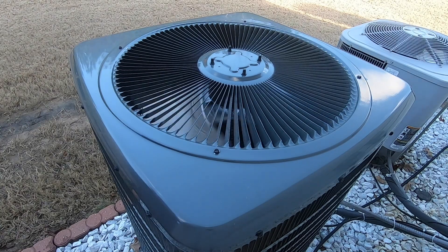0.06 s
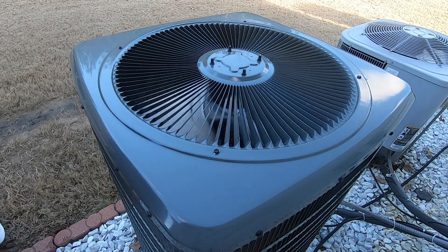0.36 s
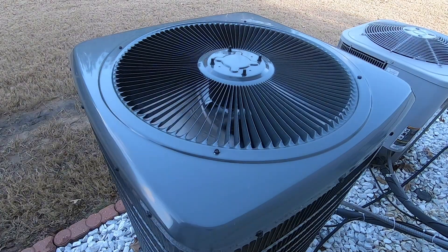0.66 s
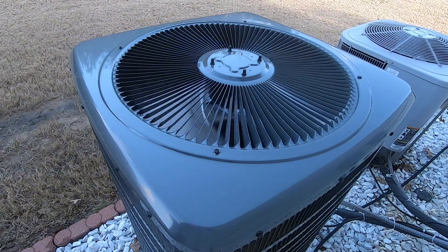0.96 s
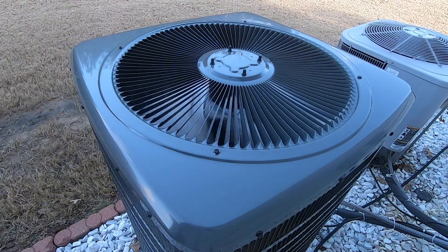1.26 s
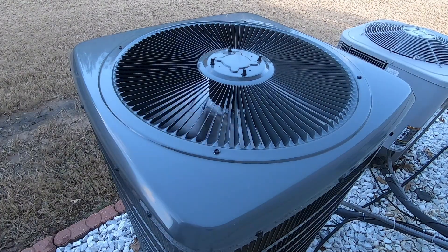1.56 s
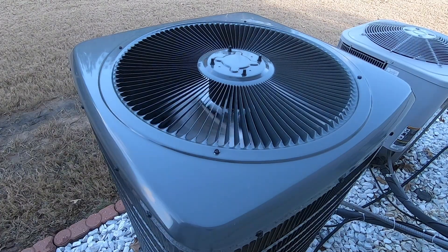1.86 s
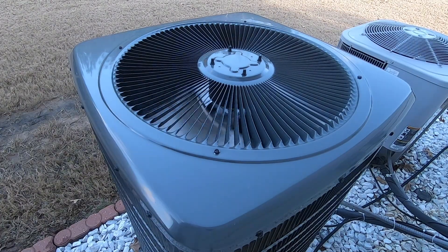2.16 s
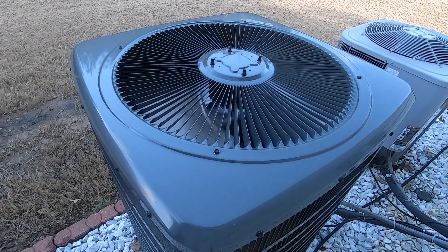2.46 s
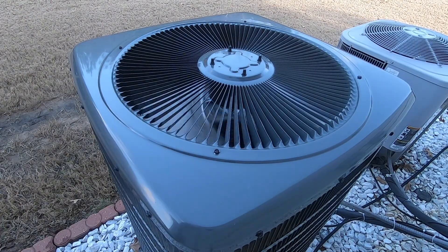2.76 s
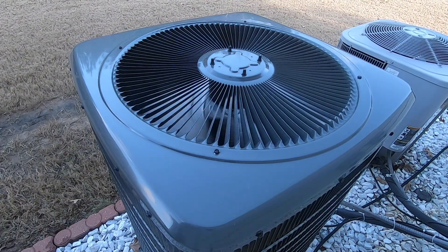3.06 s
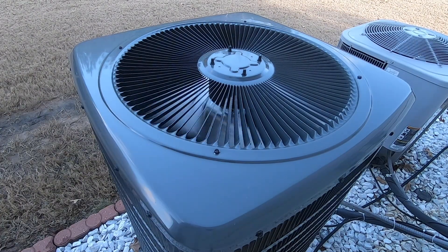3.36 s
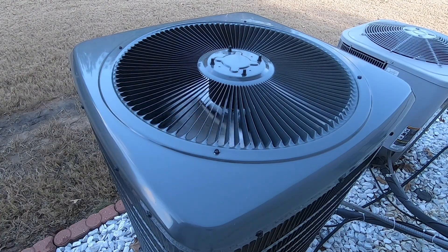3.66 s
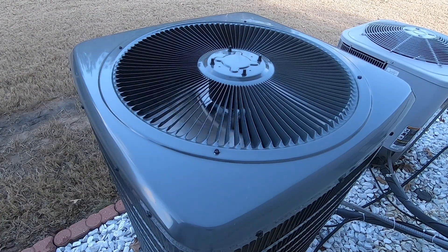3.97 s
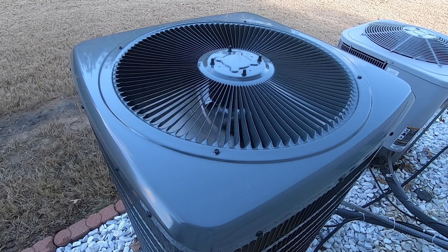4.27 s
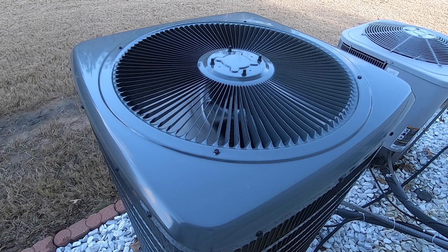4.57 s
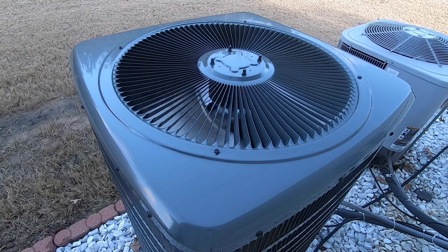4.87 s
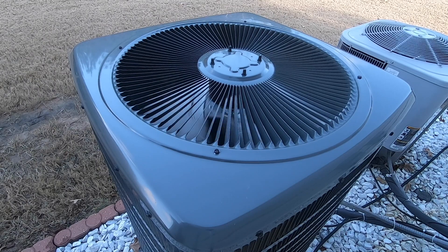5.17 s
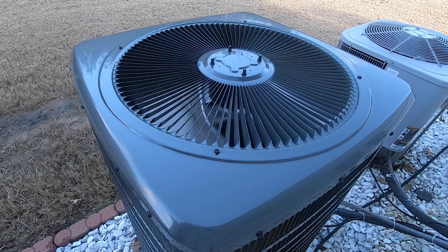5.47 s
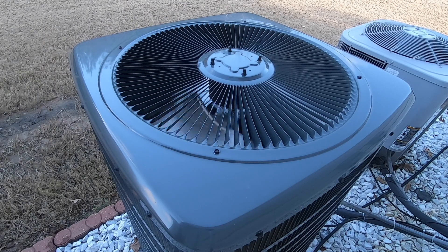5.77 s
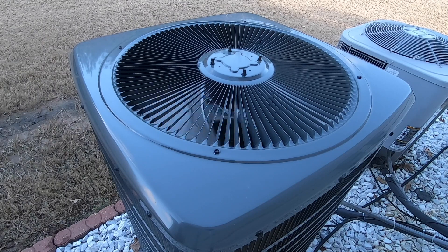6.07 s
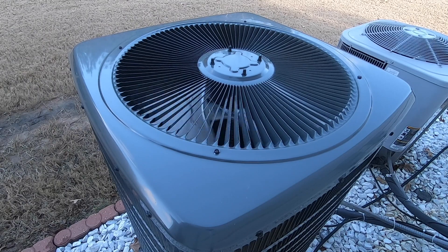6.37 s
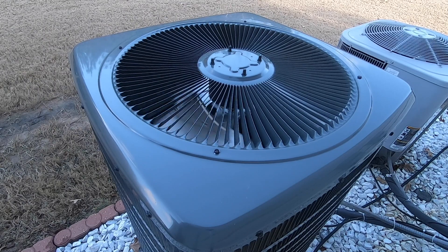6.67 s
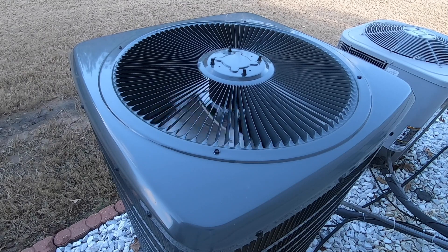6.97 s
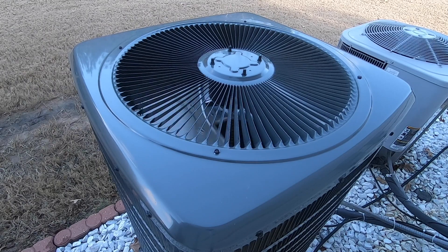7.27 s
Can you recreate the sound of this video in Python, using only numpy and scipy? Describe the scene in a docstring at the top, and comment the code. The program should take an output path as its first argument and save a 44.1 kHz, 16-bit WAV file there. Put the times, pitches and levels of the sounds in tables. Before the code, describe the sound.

An outdoor heat pump runs close by in the open air, its fan whooshing over a humming compressor, with one small snap from the cabinet. The sound turns duller as a hollow roar swells and the draught buffets the microphone. The unit then switches off with a clunk, a rush of gas and a low groan, followed by metallic knocks, a squeak and slowing ticks. The fan coasts down, leaving a second unit humming quietly.

```python
"""An outdoor heat pump runs: three-blade fan, compressor, mains hum; the cabinet snaps once.
Its draught buffets a near microphone; from 2.8 s the sound dulls and narrows, and a hollow roar swells.
At 4.8 s it switches off with a clunk; gas rushes back, the compressor groans, knocks, squeaks and
ticks to rest. The fan coasts down, the image reopens, and a second unit is left humming quietly."""
import sys
import numpy as np
from scipy import signal
from scipy.fft import rfft, irfft, next_fast_len
from scipy.io import wavfile
from scipy.ndimage import map_coordinates

SR = 44100
rng = np.random.default_rng(int(sys.argv[2]) if len(sys.argv) > 2 else 0)


def log_audio(samples):
    """Write samples as a 16-bit WAV file to the path given in sys.argv[1]."""
    # one column per channel
    frames = np.atleast_2d(samples).T
    # limit to full scale, then quantise
    limited = np.clip(frames, -1, 1)
    pcm = np.round(limited * 32767).astype(np.int16)
    wavfile.write(sys.argv[1], SR, pcm)


N = 331191
T = np.arange(N) / SR
STOP_S = 4.81  # power cut


def amp(db):
    """Decibels to gain."""
    return np.exp(np.asarray(db) * (np.log(10) / 20))


def unit(x):
    """Scales to rms 1."""
    return x / np.sqrt(np.mean(x ** 2) + 1e-20)


def curve(rows, column=1):
    """One column of a time table at every sample."""
    rows = np.array(rows, float)
    return np.interp(T, rows[:, 0], rows[:, column])


def ramp(start_s, length_s):
    """Linear rise from 0 to 1."""
    return np.clip((T - start_s) / length_s, 0, 1)


def since(s):
    """Seconds after time s, 0 before."""
    return np.maximum(T - s, 0)


def swell(s, half_s):
    """Rounded peak at time s with exponential flanks."""
    return 1 / np.cosh(np.minimum(abs(T - s) / half_s, 100) * np.pi / 2)


def drift(rate_hz):
    """Smooth random curve of rms 1."""
    knots = rng.standard_normal(4096)
    return unit(map_coordinates(knots, [T[::64] * rate_hz], order=3, mode="wrap")).repeat(64)[:N]


def add(mix, s, sound):
    """Mixes a sound in at time s."""
    part = mix[..., round(s * SR):][..., :sound.shape[-1]]
    part += sound[..., :part.shape[-1]]


def lowpass(x, hz, order=2):
    """Butterworth low-pass."""
    return signal.sosfilt(signal.butter(order, min(hz, .45 * SR), fs=SR, output="sos"), x)


def resonate(x, hz, width_hz, lift_db):
    """Lifts one band with a ringing resonance."""
    band = signal.lfilter(*signal.iirpeak(hz, 2 * hz / width_hz, fs=SR), x)
    return x + (amp(lift_db) - 1) * band


def colour(x, spectrum, peaks=()):
    """Filters by a smooth spectrum with resonant bumps."""
    size = next_fast_len(x.shape[-1])
    hz = np.fft.rfftfreq(size, 1 / SR)
    knot_hz, knot_db = np.transpose(spectrum)
    db = np.interp(np.log(hz + 1), np.log(knot_hz), knot_db)
    db += sum(lift / (1 + (2 * (hz - centre) / width) ** 2) for centre, width, lift in peaks)
    return irfft(rfft(x, size) * amp(db), size)[..., :x.shape[-1]]


def hiss(spectrum, peaks=()):
    """Stereo noise of a given density, narrowest in the low mids, rolled off above the last point."""
    spread = [(25, -3), (60, -3.5), (130, -15), (290, -19.5), (640, -7.5), (1400, -2), (3100, -8.5),
              (4600, -4.5), (6800, 2), (9000, 3), (10500, -2), (15000, 0)]  # stereo width: f/Hz, side re mid/dB
    mid, side = rng.standard_normal((2, N)) * np.sqrt(SR / 2)
    side = colour(side, spread)
    top_hz, top_db = spectrum[-1]
    rolled_off = list(spectrum) + [(2 * top_hz, top_db - 50)]
    return colour(np.array([mid + side, mid - side]), rolled_off, peaks)


def tones(rows, hz, waver_db, waver_hz=3):
    """Multiples of hz, each wavering in level."""
    turns = np.cumsum(hz * np.ones(N)) / SR
    out = 0
    for multiple, db in rows:
        gain = np.sqrt(2) * amp(db + waver_db * drift(waver_hz))
        out += gain * np.sin(2 * np.pi * (multiple * turns + rng.random()))
    return out


def narrowband(hz, width_hz):
    """Noisy partial of rms 1; its centre may move."""
    a, b = lowpass(rng.standard_normal((2, N)), width_hz / 2)
    turns = np.cumsum(hz * np.ones(N)) / SR
    return unit(((a + 1j * b) * np.exp(2j * np.pi * turns)).real)


def fan_speed(drag_per_s=.9):
    """Share of full speed: drag slows the unpowered fan."""
    return 1 / (1 + drag_per_s * since(STOP_S))


def neighbour():
    """The second unit hisses and hums steadily."""
    air = [(15, -76), (35, -82), (90, -66), (170, -75), (330, -85), (650, -82), (1100, -90), (1900, -99.5),
           (3800, -101), (5500, -113), (8000, -114), (9900, -118), (10700, -127), (12700, -128),
           (13500, -145)]  # its hiss: f/Hz, density/(dB per Hz)
    resonances = [(2169, 45, 10), (2369, 50, 9), (2573, 40, 7), (2891, 32, 12), (3284, 60, 9),
                  (3677, 80, 8), (3840, 90, 9.5), (4113, 65, 11), (4450, 70, 7), (4700, 230, 9),
                  (5270, 70, 7), (5460, 170, 7.5), (5960, 80, 6), (6190, 70, 8.5), (6842, 90, 8.5),
                  (8010, 190, 10), (8301, 90, 9), (9900, 160, 7)]  # f/Hz, width/Hz, lift/dB
    hum = [(91.5, -50), (120, -52.5), (581, -69.5)]  # f/Hz, level/dB
    return hiss(air, resonances) * amp(.5 * drift(8.8)) + tones(hum, 1, waver_db=-0.5)


def wind(roar_start_s=3.035, roar_rise_s=0.31, roar_hold_s=0.46, roar_fade_db_per_s=6.5):
    """Draught and deep buffeting follow exposure and fan speed; a roar over the grille swells and fades."""
    exposure = [(0, -14), (3.0, -21.5), (3.4, -16), (3.85, -27), (4.04, -3), (4.35, -2), (4.8, -1.5)]  # draught reaching the microphone: t/s, level/dB
    draught_spectrum = [(15, -74), (35, -58), (110, -51), (200, -57), (400, -59), (700, -64), (1200, -68.5),
                        (2000, -76), (4000, -90), (8000, -115)]  # f/Hz, density/(dB per Hz)
    hollow_resonance = [(247, 30, 1)]  # f/Hz, width/Hz, lift/dB
    buffet_spectrum = [(12, -68), (30, -52.5), (55, -47.5), (100, -51.5), (150, -56.5), (250, -72.5),
                       (600, -100)]  # f/Hz, density/(dB per Hz)
    roar_spectrum = [(150, -101), (380, -73), (540, -64), (720, -65), (1000, -72.5), (1500, -77.5),
                     (3000, -100), (5100, -89), (6400, -108)]  # f/Hz, density/(dB per Hz)
    exposure_db, speed = curve(exposure), fan_speed()
    draught = hiss(draught_spectrum, hollow_resonance) * amp(exposure_db + 1.1 * drift(25))
    buffet = hiss(buffet_spectrum) * amp(0.71 * exposure_db + drift(13))
    fade_db = roar_fade_db_per_s * since(roar_start_s + roar_rise_s + roar_hold_s)
    roar = hiss(roar_spectrum) * ramp(roar_start_s, roar_rise_s) * amp(drift(11) - fade_db)
    return draught * speed ** 2.46 + buffet * speed ** 1.6 + roar


def gusts():
    """Single eddies thump the two microphone ports unequally."""
    eddies = [(2.116, .014, -22, 16, 190), (2.575, .03, -20.5, 5, 110), (2.69, .04, -26, -4, 150),
              (2.865, .014, -18, 2, 220), (3.045, .035, -21, -7, 100), (3.385, .013, -21.5, 0, 90),
              (3.485, .03, -28.5, 0, 150), (3.622, .013, -14, 0, 130), (6.02, .04, -34, 0, 110),
              (6.18, .03, -35, 0, 130), (6.52, .04, -36, 0, 110)]  # t/s, Gaussian sigma/s, level/dB, left re right/dB, upper edge/Hz
    out, t = np.zeros((2, N)), np.arange(-SR // 5, SR // 5) / SR
    for s, sigma_s, db, pan_db, edge_hz in eddies:
        eddy = lowpass(rng.standard_normal((2, len(t))), edge_hz, order=3)
        eddy -= lowpass(eddy, 3.8, order=1)
        shape = np.exp(-(t / sigma_s) ** 2 / 2)
        eddy = np.array([unit(port * shape) for port in eddy]) * np.sqrt(np.mean(shape ** 2))
        add(out, s + t[0], eddy * amp([[db + pan_db / 2], [db - pan_db / 2]]))
    return out


def cabinet_snap(at_s=.5045, gain_db=-20.5, t60_s=0.012, tail_db=-16, tail_t60_s=0.07):
    """A small dull snap with a faint tail."""
    spectrum = [(300, -17), (1200, 1), (2800, 5), (4000, 0), (5500, -9), (8500, -14), (10500, -33),
                (15000, -48)]  # f/Hz, gain/dB
    t = since(at_s)
    shape = (T >= at_s) * (amp(-60 * t / t60_s) + amp(tail_db - 60 * t / tail_t60_s))
    return colour(amp(gain_db) * shape * rng.standard_normal(N), spectrum)


def boom(hz=86.2, db=-36):
    """A low, uneven boom swells and fades while the fan coasts."""
    return narrowband(hz, width_hz=35) * amp(db) * swell(6.02, half_s=0.47)


def coasting(air, blend_s=0.46):
    """The moving air loses some hiss after the power cut."""
    slow_air = [(60, 2), (160, 1.5), (350, -0.5), (600, 0), (1150, 1), (3200, 0.5), (5200, -5), (12000, 0)]  # f/Hz, gain/dB
    return air + ramp(STOP_S, blend_s) * (colour(air, slow_air) - air)


def fan(blades=3, full_blade_hz=42.74, tone_fade_db_per_s=26):
    """Blade tones and air rushing through blades and grille; both fall with the speed."""
    harmonics = [(1, -40), (2, -31.5), (3, -46.5), (4, -44), (5, -55.5), (6, -48), (7, -68), (8, -50.5),
                 (9, -63), (12, -54.5), (13, -51.5), (14, -57), (15, -69)]  # multiple of blade rate, level/dB
    tone_gain = [(0, 0), (1.9, 1), (2.25, 2.5), (3.2, -1), (3.9, -2.5), (4.35, 5.5), (4.78, 7)]  # blade tones at the microphone: t/s, gain/dB
    air_spectrum = [(15, -84), (35, -62), (90, -57), (160, -64.5), (280, -67.5), (600, -67.5),
                    (1500, -73.5), (2400, -77), (4000, -84), (6200, -94), (9300, -100.5), (10200, -105),
                    (12500, -108), (15000, -118)]  # f/Hz, density/(dB per Hz)
    air_resonances = [(4770, 100, 5.2), (5060, 120, 3.4), (5790, 180, 5.5), (6800, 100, 4.4),
                      (8900, 150, 2.6), (9200, 190, 1.6), (11600, 130, 3)]  # f/Hz, width/Hz, lift/dB
    speed = fan_speed()
    blade_hz = full_blade_hz * speed * (1 + .001 * drift(2))
    passes = np.cumsum(blade_hz) / SR
    swish = 1 + 0.019 * np.sin(2 * np.pi * passes) + 0.026 * np.sin(2 * np.pi * passes / blades)
    air = hiss(air_spectrum, air_resonances) * swish * amp(0.4 * drift(18))
    drone = tones(harmonics, blade_hz, waver_db=2.18, waver_hz=8)
    drone *= amp(curve(tone_gain) - tone_fade_db_per_s * since(STOP_S))
    return air * speed ** 4.05 + drone * speed ** 2.4


def rotor_ticks(first_s=5.451, turn_s=.0508, growth_s=.0054, loudest_s=5.83, rise_s=0.0034, t60_s=0.11):
    """The slowing rotor rubs, and ticks at each ever longer turn, ringing its housing."""
    spectrum = [(600, -12), (1500, -3), (2200, 1), (3400, 0), (4500, -10.5), (6500, -21), (12000, -49)]  # f/Hz, gain/dB
    housing = [(2090, 110, 9), (2380, 90, 7), (2890, 60, 8), (3100, 50, 6), (3290, 70, 6), (3800, 80, 6)]  # resonances: f/Hz, width/Hz, lift/dB
    out = unit(colour(rng.standard_normal(N), spectrum, housing)) * amp(-60.5) * swell(5.8, 0.5)  # rub
    t, turn = np.arange(SR // 2) / SR, np.arange(10)
    times_s = first_s + turn_s * turn + growth_s * turn * (turn - 1) / 2
    levels_db = -42 - 18 * abs(times_s - loudest_s)
    for s, db in [*zip(times_s, levels_db), (6.452, -48.5)]:  # one more as it settles
        tick = unit(colour(rng.standard_normal(len(t)), spectrum, housing))
        add(out, s, tick * amp(db - 60 * t / t60_s) * (1 - np.exp(-t / rise_s)))
    return out


def squeak(at_s=5.296, half_s=.012, sag_per_s=1.44, treble_lead_s_per_hz=2.2e-6):
    """Dry metal rubs as the rotor brakes: noisy partials sag in pitch inside a longer scrape."""
    scrape = [(2000, -102), (3500, -74), (9000, -83.5), (12000, -93), (15000, -102)]  # f/Hz, density/(dB per Hz)
    partials = [(3285, 230, -27.5), (2210, 320, -41), (4510, 780, -42), (6300, 690, -46), (7720, 420, -36),
                (9140, 300, -42)]  # f/Hz, width/Hz, level/dB
    out = hiss(scrape) * swell(5.287, half_s=0.032)
    for hz, width_hz, db in partials:
        s = at_s - treble_lead_s_per_hz * (hz - partials[0][0])
        a, b = lowpass(rng.standard_normal((2, N)), width_hz / 2)
        t, shape = T - s, swell(s, half_s)
        partial = ((a + 1j * b) * np.exp(2j * np.pi * hz * (t - sag_per_s * t ** 2 / 2))).real
        out += amp(db) * unit(partial * shape) * np.sqrt(np.mean(shape ** 2))
    return out


def backspin(rush_rise_s=0.07, ebb_db_per_s=62, valve_s=5.1, choke_db_per_s=110):
    """Trapped gas drives the compressor backwards: low gliding groans and a hiss chopped at each turn."""
    groans = [(4.825, 105.5, 13, -18.5, .04, .04, .95), (4.89, 65, -15, -33, .04, .03, 3),
              (5.072, 113, 15, -21, .015, .015, .14), (5.04, 150, 15, -32, .03, .11, 1.0),
              (5.26, 314, 0, -44.5, .04, .1, .4)]  # t/s, start f/Hz, glide/(Hz/s), level/dB, rise/s, hold/s, t60/s
    backflow = [(25, -71), (100, -46.5), (300, -58), (900, -59), (1600, -60), (2600, -68.5), (4700, -71.5),
                (6500, -80), (9000, -84), (12000, -96), (15000, -103)]  # gas hiss: f/Hz, density/(dB per Hz)
    groan = 0
    for s, hz, glide, db, rise_s, hold_s, t60_s in groans:
        voice = tones([(1, 0), (2, -37), (3, -26)], hz + glide * since(s), waver_db=3.5)
        groan += voice * ramp(s, rise_s) * amp(db - 60 * since(s + rise_s + hold_s) / t60_s)
    s, hz, glide = groans[0][:3]
    chop = 1 + 0.12 * np.sin(2 * np.pi * np.cumsum(hz + glide * since(s)) / SR)
    # the flow ebbs as pressures even out, then the valve shuts
    flow_db = -2.5 - ebb_db_per_s * since(STOP_S + rush_rise_s) - choke_db_per_s * since(valve_s)
    return groan + hiss(backflow) * chop * ramp(STOP_S, rush_rise_s) * amp(flow_db + drift(120))


def knocks(rise_s=.002, cluster_size=4, mode_split=.026):
    """Contactor and compressor blows: a sheet-metal crash and split shell modes, with one band lifted."""
    # t/s, level/dB, t60/s, upper edge/Hz, ring gain/dB, lifted band: f/Hz, width/Hz, lift/dB
    blows = [(4.808, -19.5, 0.042, 10000, -21, 242, 100, 19), (4.818, -21, 0.067, 7000, -26, 4800, 900, 8),
             (5.103, -21.5, 0.079, 4100, -14.5, 1090, 260, 9),
             (5.299, -25, 0.097, 2400, -12.5, 1080, 300, 4), (5.35, -25, 0.1, 2500, -13, 2105, 340, 11)]
    crash_spectrum = [(30, -12), (100, 8), (250, 2), (600, 0), (1100, 4.5), (2200, -3.5), (3300, 0),
                      (4600, -5.5), (7000, -11), (9500, -11.5), (13000, -12), (15500, -33)]  # f/Hz, gain/dB
    shell_modes = [(318, -1, .8), (759, 1, .6), (851, -4, .55), (947, -2, .6), (1030, -4, .6),
                   (1120, -5, .6), (1249, -2, .55), (1610, -6, .45), (2051, -7, .5), (2150, -8, .45),
                   (2406, -10, .45), (3063, -9, .4), (3200, -7, .3), (8200, -14, .15)]  # f/Hz, level/dB, t60/s
    out, t = np.zeros(N), np.arange(SR * 3 // 4) / SR
    for s, db, t60_s, edge_hz, ring_db, *band in blows:
        crash = unit(lowpass(colour(rng.standard_normal(len(t)), crash_spectrum), edge_hz))
        crash *= amp(-1.5 - 60 * t / t60_s)
        ring = 0
        for hz, mode_db, mode_t60_s in shell_modes:
            detune, phase = rng.uniform(-1.006, 1, (2, cluster_size, 1))
            cluster = np.sin(2 * np.pi * (hz * (1 + mode_split * detune) * t + phase)).sum(0)
            ring += amp(mode_db - 60 * t / mode_t60_s) * cluster / np.sqrt(cluster_size)
        blow = resonate(crash + amp(ring_db) * ring / 2, *band)  # band set by where it lands
        add(out, s, amp(db) * (1 - np.exp(-t / rise_s)) * blow)
    return out


def compressor(shaft_hz=58.95, mains_hz=60.0, whistle_hz=8450, fade_s=0.044):
    """Shaft orders, gas pulsing at each turn, magnetic hum and cabinet tones; all end with the power."""
    shaft_orders = [(2, -41), (3, -50), (4, -69), (6, -63), (7, -52.5), (9, -64), (10, -53.5), (11, -63),
                    (12, -53.5), (14, -56.5), (15, -80), (16, -54.5), (17, -51), (19, -59), (23, -84),
                    (24, -87), (70, -68)]  # multiple, level/dB
    rasp_spectrum = [(300, -100), (1200, -75.5), (1900, -78.5), (2600, -92.5), (4500, -100.5), (6200, -100),
                     (9300, -100), (10500, -112), (15000, -120)]  # gas in the pipes: f/Hz, density/(dB per Hz)
    pipe_resonances = [(1900, 760, 1.8), (4600, 160, 4.4), (5900, 130, 6), (6580, 120, 8.4),
                       (8600, 220, 8.2), (9230, 67, 4)]  # f/Hz, width/Hz, lift/dB
    pipe_ring = [(0, -43.5, 1930), (1.5, -44.5, 1920), (2.4, -46.5, 1950), (2.8, -44, 1968),
                 (2.96, -46, 1940), (3.08, -56, 1930), (3.55, -43, 1884), (3.9, -45.5, 1895),
                 (4.25, -46, 1930), (4.5, -42, 1920), (4.8, -46, 1934)]  # pipe rung by gas pulses: t/s, level/dB, f/Hz
    whistle_level = [(0, -77), (2.95, -76), (3.3, -70), (3.7, -66.5), (4.3, -68), (4.8, -68)]  # refrigerant whistle: t/s, level/dB
    mains_harmonics = [(2, -40), (4, -55.5), (6, -62.5), (8, -54)]  # motor iron: multiple, level/dB
    cabinet_tones = [(74.1, -42.5), (740.6, -56)]  # f/Hz, level/dB
    drone = tones(shaft_orders, shaft_hz * (1 + 0.0004 * drift(3)), waver_db=1.74)
    strokes = 1 + 0.37 * tones([(1, -8), (3, -14)], shaft_hz, waver_db=-1)
    rasp = hiss(rasp_spectrum, pipe_resonances) * amp(.8 * drift(5))
    mid, side = (narrowband(curve(pipe_ring, column=2), width_hz=240) for _ in range(2))
    pipe = (mid + 0.5 * np.array([side, -side])) * amp(curve(pipe_ring))
    whistle = narrowband(whistle_hz, width_hz=160) * amp(curve(whistle_level))
    hum = tones(mains_harmonics, mains_hz, waver_db=1) * (1 + 2.9 * swell(4.44, half_s=0.078))
    cabinet = tones(cabinet_tones, 1, waver_db=2.5)
    powered = np.exp(-since(STOP_S) / fade_s)
    return powered * (drone + (rasp + pipe + whistle) * strokes + hum + cabinet)


def scene():
    """All sources close by, in the open air."""
    running = coasting(fan() + wind()) + compressor() + gusts() + cabinet_snap()
    stopping = knocks() + rotor_ticks() + backspin() + squeak() + boom()
    return running + stopping + neighbour()


def record(dry, close_s=2.83, dull_s=0.15, narrow_s=0.6, reopen_s=6.08, opening_s=0.96, edge_hz=15500):
    """The band-limited image leans right; it dulls and closes to mono, then partly reopens."""
    balance = [(300, 0), (700, -1), (1300, -2.5), (2400, -0.5), (4400, -0.8), (8100, -4.5), (12000, 0.5)]  # f/Hz, left re right/dB
    sheen_spectrum = [(300, -55), (1500, -25), (3000, -5.5), (5000, -13), (6300, 0.5), (8000, 3.5),
                      (9100, 2.5), (10200, -11), (15000, -35)]  # added treble: f/Hz, gain/dB
    leaning = np.array([colour(port, [(hz, sign * db / 2) for hz, db in balance])
                        for port, sign in zip(dry, (1, -1))])
    reopened = ramp(reopen_s, opening_s)
    early_sheen = np.where(T < 0.45, 0.55, 0.92)  # the treble steps up
    sheen = early_sheen * (1 - ramp(close_s, dull_s)) + 0.55 * reopened
    width = 1 - ramp(close_s, narrow_s) + 0.77 * reopened
    bright = leaning + sheen * colour(leaning, sheen_spectrum)
    mid = bright.mean(0)
    out = mid + width * (bright - mid)
    band_limit = signal.firwin(511, edge_hz, window=("kaiser", 9), fs=SR)
    return signal.oaconvolve(out, band_limit[None], "same")


dry = scene()
out = record(dry)
log_audio(out)
```